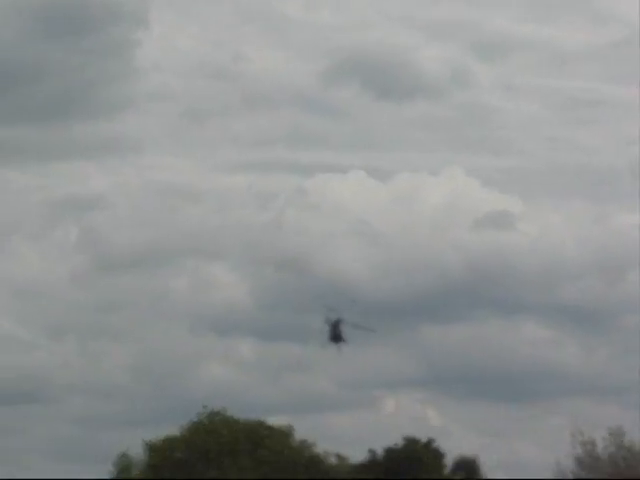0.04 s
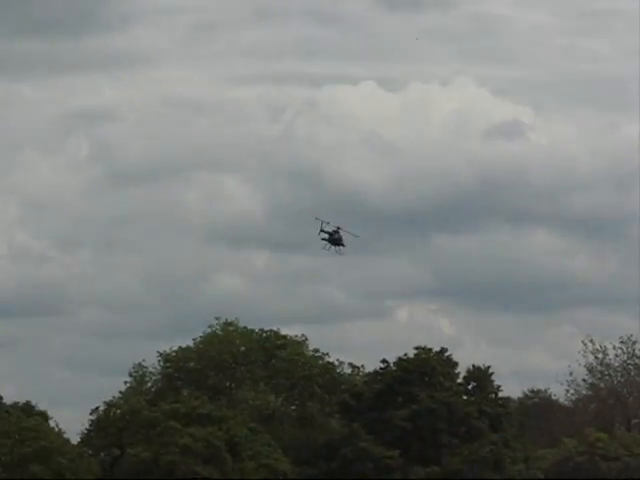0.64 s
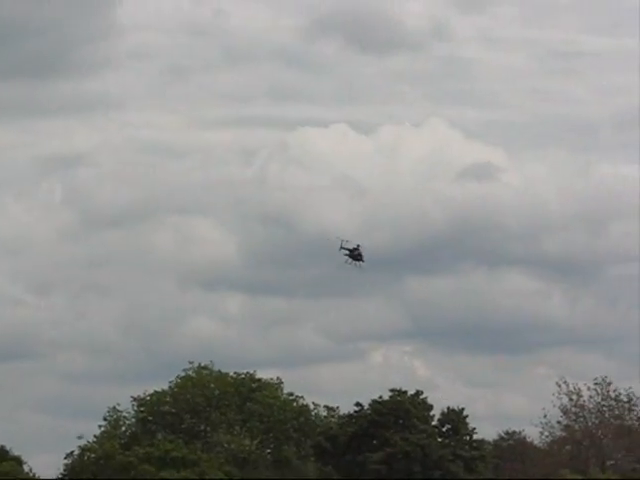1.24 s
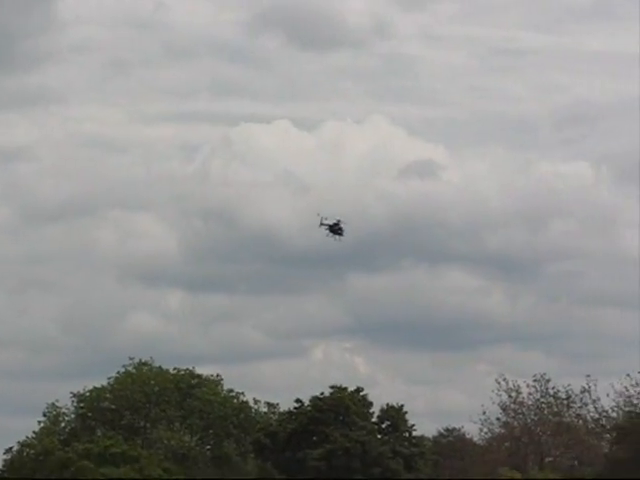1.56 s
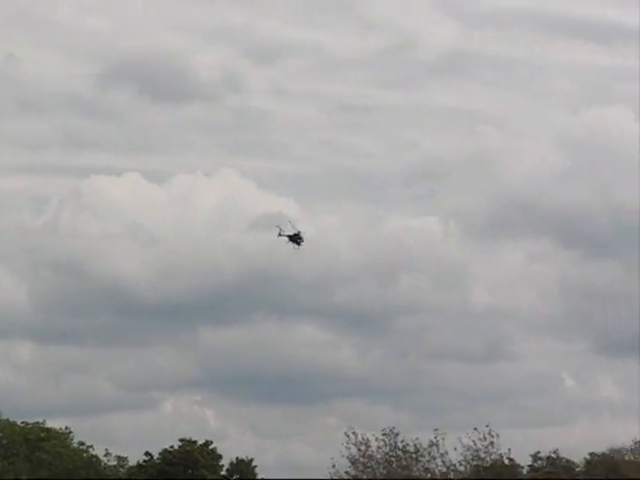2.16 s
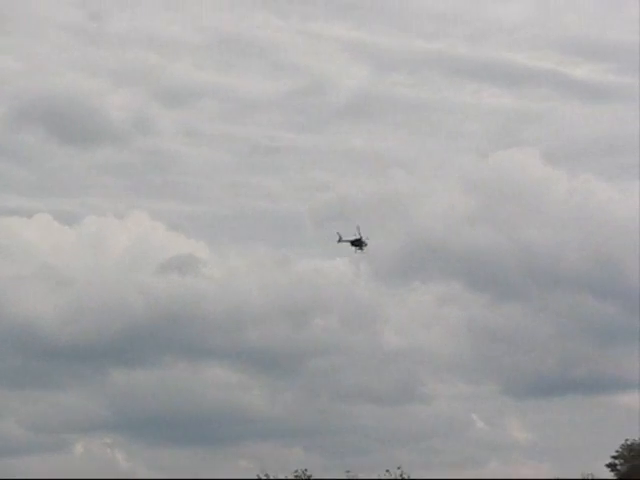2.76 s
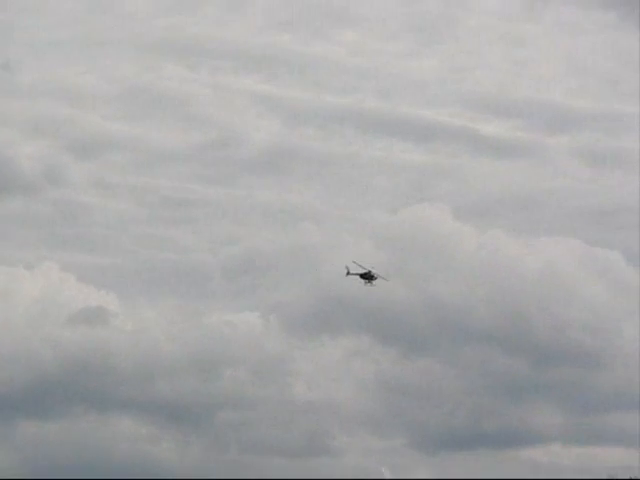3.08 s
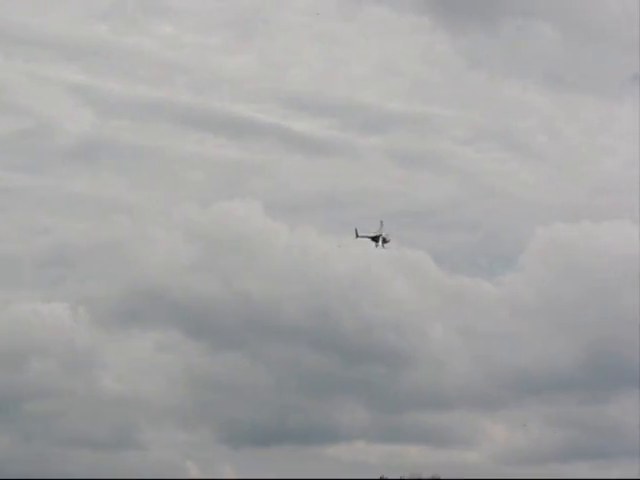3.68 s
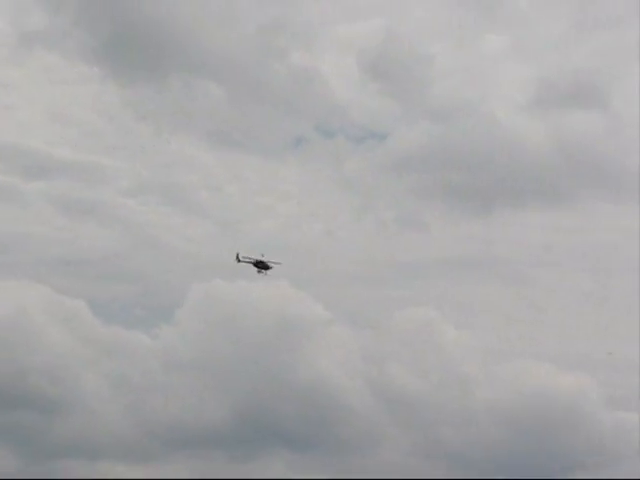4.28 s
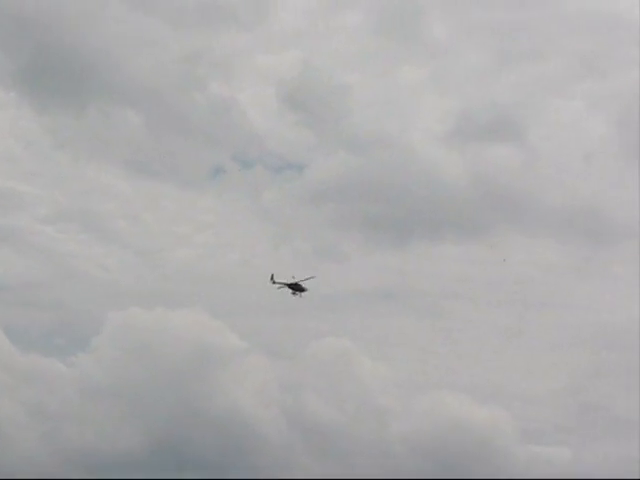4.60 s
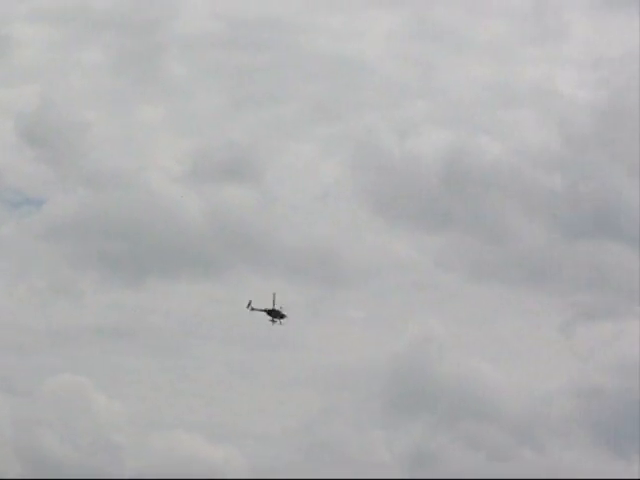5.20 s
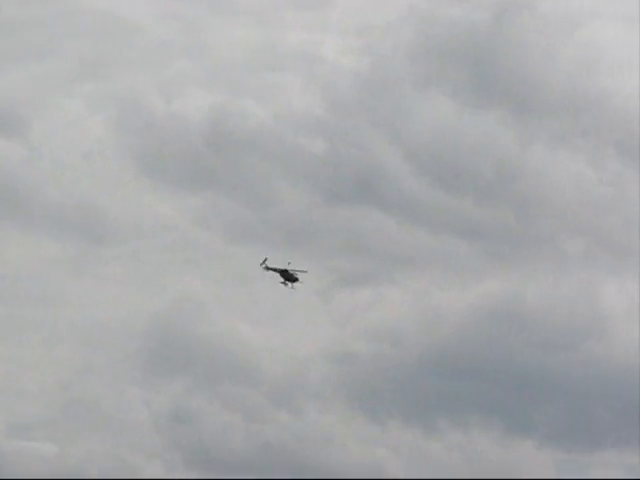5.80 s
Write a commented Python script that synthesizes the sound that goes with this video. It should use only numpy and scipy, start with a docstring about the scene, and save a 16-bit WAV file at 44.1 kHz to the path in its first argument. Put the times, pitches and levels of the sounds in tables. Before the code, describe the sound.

A radio-controlled model helicopter flies over an open field, its small two-stroke engine giving a continuous high, raspy whine over the whir of the rotors. The tone flutters and flares as it turns, creeping up in pitch. Near the end the main rotor thrums louder and the tail rotor surges briefly. A breeze rumbles lightly on the microphone, with a faint, low, far-off drone underneath.

```python
"""A model helicopter flies over a field, at first tail towards us, above a breeze and a far-off drone.
Its two-stroke engine whines and rasps through a ringing muffler while the rotors chop the air and hum.
From 1.6 s it turns in steps to face us, and the engine climbs in pitch as the drone slowly sinks.
Near 5 s the tail rotor surges, the main rotor thrums louder and the drone swells again.
All along, trees scatter the sound into a microphone with two openings, left and right."""
import sys
import numpy as np
from scipy import signal
from scipy.fft import rfft, irfft, next_fast_len
from scipy.io import wavfile
from scipy.ndimage import map_coordinates

SR = 44100
rng = np.random.default_rng(int(sys.argv[2]) if len(sys.argv) > 2 else 0)


def file_out(sig):
    """Save sig as 16-bit WAV at sys.argv[1]."""
    # one column per channel
    cols = np.atleast_2d(sig).T
    # limit, then scale
    lim = np.clip(cols, -1, 1)
    pcm = np.round(lim * 32767).astype(np.int16)
    wavfile.write(sys.argv[1], SR, pcm)


N = 257984  # 5.85 s

# Levels are relative: the functions set the final mix. Harmonic k is a tone at k times the firing rate.
# how often the engine fires: t/s, f/Hz
FIRING_RATE = [(0, 249.5), (.45, 250), (.95, 251.5), (1.3, 253.8), (1.9, 253.6), (2.55, 257.3),
               (2.8, 257.5), (3.2, 259.7), (3.6, 263.4), (4.0, 267.6), (4.4, 270.4), (4.8, 274.4),
               (5.4, 279), (5.6, 279.3), (5.85, 280.9)]
MAIN_GEAR, TAIL_GEAR = 2 / 8.5, 9 / 8.5  # blade passes per firing
# the side we see: t/s, view (0 behind, 1 rear quarter, 2 side, 3 front quarter)
VIEW_OVER_TIME = [(0, 0), (1.6, 0), (2.2, 1), (2.82, 1), (3.08, 2), (3.6, 2), (4.2, 3), (5.85, 3)]

# the harmonics that make the whine: harmonic number
WHINE_HARMONICS = [2, 3, 5, 6, 8, 9, 10, 11, 12, 13, 14]
# how loud each of them is, up to the thirteenth: t/s, level/dB
LEVEL_2 = [(0, -42), (1.5, -45.5), (2.5, -46.5), (3.4, -50.5), (3.9, -45), (4.3, -44), (4.7, -46.5),
           (5.2, -50), (5.55, -63)]
LEVEL_3 = [(0, -40.5), (.7, -48.5), (1.3, -45), (1.7, -46), (2.548, -41), (2.95, -44.5), (3.15, -58),
           (3.6, -57), (4.1, -45.5), (4.3, -48), (4.45, -62), (4.75, -59), (4.85, -46), (5.5, -40),
           (5.8, -52)]
LEVEL_5 = [(0, -34), (.25, -42.5), (.55, -52), (1.0, -46.5), (1.55, -47), (1.9, -45), (2.55, -40),
           (2.95, -34), (3.25, -44.5), (4.1, -61), (5, -58), (5.45, -47), (5.85, -39)]
LEVEL_6 = [(0, -33.5), (.3, -31.5), (.7, -42), (1.4, -51), (1.8, -43), (2.8, -50.5), (3.02, -30),
           (3.65, -33.5), (4.03, -46), (4.3, -38.5), (5.05, -33), (5.25, -38.5), (5.85, -40)]
LEVEL_8 = [(0, -31.5), (.32, -22.5), (.42, -25.5), (.55, -38), (.78, -26), (.93, -37.5), (1.14, -22.5),
           (1.25, -27), (1.37, -39.5), (1.57, -28), (1.78, -38.5), (1.96, -28), (2.2, -41), (2.5, -29.5),
           (2.84, -56), (3.05, -30.5), (3.3, -40), (3.5, -32.5), (3.8, -32.5), (4.051, -54), (4.25, -34),
           (4.549, -50), (4.82, -31.5), (5.2, -57), (5.52, -39), (5.75, -60)]
LEVEL_9 = [(0, -47), (.28, -50), (.55, -58), (.8, -45), (1.598, -65), (2.7, -47), (3.2, -58), (3.68, -47),
           (3.85, -39), (4.45, -44.5), (5.15, -39), (5.85, -52)]
LEVEL_10 = [(0, -21.5), (.24, -22), (.5, -43), (1.1, -45), (1.55, -37), (1.78, -43), (1.95, -23.5),
            (2.12, -25), (2.28, -19.5), (2.52, -17), (2.699, -20.5), (2.85, -31), (2.98, -28.5),
            (3.05, -22.5), (3.22, -24.5), (3.32, -19), (3.42, -27), (3.5, -22), (3.64, -29.5), (3.8, -25),
            (4.03, -45.5), (4.36, -50), (4.44, -26.5), (4.52, -33), (4.88, -22), (5.08, -31.5), (5.23, -21),
            (5.45, -34.5), (5.53, -27), (5.68, -33), (5.85, -35.5)]
LEVEL_11 = [(0, -30), (.212, -20.5), (.36, -42), (.48, -30.5), (.6, -39), (.76, -28), (.87, -51),
            (.97, -32), (1.12, -25.5), (1.26, -42), (1.43, -30), (1.75, -49), (2.05, -46), (2.5, -32),
            (3.1, -52), (3.6, -43), (3.85, -33), (4.02, -51), (4.2, -36.5), (4.55, -33), (4.92, -26.5),
            (5.12, -33), (5.35, -28.5), (5.85, -39)]
LEVEL_12 = [(0, -23.5), (.21, -23.5), (.55, -52), (.9, -39), (1.05, -45), (1.3, -33.5), (1.6, -41),
            (1.95, -31), (2.2, -44), (2.55, -42), (2.74, -29.5), (3.2, -42.5), (4.5, -44), (4.88, -28),
            (5.15, -42), (5.4, -37), (5.85, -57)]
LEVEL_13 = [(0, -28.5), (0.219, -22.5), (.62, -45), (.87, -29), (1.05, -41), (1.3, -31.5), (1.65, -40),
            (2.248, -30), (2.7, -45), (3.4, -50), (5.85, -53)]
# the harmonics that make the exhaust's hum: harmonic number
HUM_HARMONICS = [4, 7]
# one row for each of them: level/dB in views 0, 1, 2, 3
HUM_BY_VIEW = [(-53, -57.5, -42, -44.5), (-51.5, -34, -43.5, -41.5)]

# the rough part of the exhaust: t/s, rasp level/dB, sizzle level/dB
ROUGH_LEVELS = [(0.0, -25, -32), (0.19, -26.5, -32), (0.36, -28, -37.5), (0.6, -36, -44.5),
                (0.82, -29.5, -39), (1.3, -32, -42.5), (1.7, -34, -41.5), (2.85, -31, -42.5),
                (3.05, -31, -40), (3.2, -36, -44.5), (3.5, -32, -41.5), (3.6, -41.5, -48),
                (3.7, -31.5, -40), (3.93, -33, -41.5), (4.03, -35, -44.5), (4.42, -35.5, -46.5),
                (4.52, -39, -49.5), (4.65, -31.5, -41.5), (5.47, -31.5, -39.5), (5.85, -34, -46)]
# its brief flares and dips: t/s, half length/s, rasp change/dB, sizzle change/dB, whistle change/dB
EXHAUST_FLARES = [(1.53, .05, -0.5, -3, -2), (1.82, .07, 0.5, -1, -4), (2.02, 0.055, 2.5, 5, 5),
                  (2.25, 0.049, 2, 6, -5), (2.38, 0.032, 3, 0.5, 12), (2.56, 0.098, 1, -4.5, 1.5),
                  (2.72, 0.072, 1.5, 5.5, 10.5), (2.94, 0.038, 0.5, 2, 9), (3.39, 0.053, -2.5, 0, 5.5),
                  (3.82, 0.027, 4.5, 7, 13), (4.17, 0.044, 2, -1, -5), (4.24, 0.031, 5, 2, -8),
                  (4.305, 0.023, -8, -4, -5), (4.38, 0.067, 1, 3.5, -4), (4.745, 0.019, -3, 5, 4.5),
                  (4.83, 0.12, 1, 5, 10.5), (4.872, 0.04, 4, 4, -1), (5.07, .045, -2.5, -1, -3.5),
                  (5.23, 0.094, 1, -1, -4.5), (5.53, 0.031, 2.5, 0, 3), (5.65, 0.063, -1.5, 1.5, 7)]
# the muffler's tone colour (how strong each frequency is): f/Hz, level/dB
MUFFLER_COLOUR = [(900, -44.5), (1350, -9.5), (1600, -17), (1950, -4), (2250, -7.5), (2550, 0.5),
                  (2800, -0.5), (3050, -3.5), (3300, -7.5), (3650, -7.5), (4200, -16), (6000, -62)]
# harmonics thrown back by the blades: harmonic number, shift/blade rates, level/dB
THROB_TONES = [(10, -1, -5), (10, .5, -5), (10, 1, 0), (11, -1, -7), (11, -.5, -7), (11, 1, -6)]
# how strong that throb is: level/dB in views 0, 1, 2, 3
THROB_BY_VIEW = [-3.5, -4, -3.5, 0]
# the sizzle's colour from behind and from the front: f/Hz, level/dB
SIZZLE_REAR = [(2800, -25), (3700, -10), (4200, -8), (4550, -5), (5000, 4), (5700, -7), (6300, 1),
               (6800, -8), (7450, -2.5), (7900, -1), (9000, -7.5), (10000, -9.5), (10900, -22),
               (13000, -29)]
SIZZLE_FRONT = [(2800, -22), (3700, -7), (4200, -2.5), (4500, -2), (5100, 0), (5550, 5), (6300, -4),
                (7000, -5.5), (7500, -13.5), (8000, -7.5), (9300, -8), (10300, -29), (11000, -44),
                (13000, -34.5)]
# two thin tones that stand out from the front: harmonic number
THIN_HARMONICS = [16, 20]
# the sizzle's strongest ring comes and goes: t/s, level/dB
RING_LEVEL = [(0, -14.5), (.42, -7), (.62, -22), (.85, -7.5), (1.35, -4.5), (1.6, -12), (2.25, -12),
              (2.7, -11), (3.2, -16.5), (4.7, -17), (4.88, -4.5), (5.02, -13.5), (5.85, -23)]
# colours of that ring and of the top whistle: f/Hz, level/dB
RING_COLOUR = [(4100, -20), (4600, -6), (4800, -4), (5050, 0), (5400, -17)]
WHISTLE_COLOUR = [(6800, -60), (7900, -11), (8250, -2), (8650, -12.5), (10500, -33.5), (12000, -66)]

# air moved by the blades: t/s, thrum level/dB, wash level/dB
ROTOR_LEVELS = [(0, -49, -37.5), (.65, -57, -40), (1.8, -56, -44), (2.9, -56.5, -39), (3.67, -50, -38),
                (4.5, -49.5, -39), (5.15, -43, -38), (5.85, -42.5, -39)]
# colours of the rushing wash and the low churn of air: f/Hz, level/dB
WASH_COLOUR = [(60, -23), (130, -10.5), (230, -8), (420, -8), (650, 1.5), (950, 7.5), (1200, -7.5),
               (1600, -1.5), (2500, -7), (5000, -37)]
CHURN_COLOUR = [(150, -27), (250, -7), (300, 3), (380, 8.5), (480, 2.5), (700, -45.5)]
# main rotor tones and their beats with the engine: multiple of the blade rate, level/dB
MAIN_TONES = [(1, -11), (2, -16), (4.25, -9), (5.25, -4), (6.25, -10)]
# the tail rotor's higher tones: multiple of its blade rate, level/dB
TAIL_TONES = [(2, -6.5), (3, -3), (4, -23)]
# the tail rotor bites the air in short surges: t/s, half length/s, level/dB
TAIL_SURGES = [(4.835, 0.043, -39), (5.16, 0.035, -39), (5.265, 0.031, -38), (5.41, 0.021, -34),
               (5.573, 0.02, -46)]
# colour of a surge: f/Hz, level/dB
SURGE_COLOUR = [(200, -3), (295, -0.5), (590, -7), (880, -2.5), (1200, -21.5)]

# the far drone's sinking pitch: t/s, f/Hz
DRONE_HZ = [(0, 92.86), (2, 87.2), (4, 86.75), (5.85, 85.1)]
# it swells at both ends: t/s, level/dB
DRONE_LEVEL = [(0, -46), (.4, -39.5), (.8, -46.5), (.92, -59), (1.45, -57), (1.7, -47.5), (2.8, -52.5),
               (4.45, -47), (4.8, -54.5), (5.45, -39), (5.85, -43.5)]
# the breeze starts strong, then eases: t/s, level/dB
BREEZE_LEVEL = [(0, 9), (1.2, -1), (2, 3), (3.5, -1), (5.5, -2)]
# colours of the breeze, its buffeting of the microphone and the drone's rumble: f/Hz, level/dB
BREEZE_COLOUR = [(15, -13), (30, -12.5), (50, -5), (70, -3.5), (115, -2), (160, -11.5), (220, -5.5),
                 (320, -16.5), (1000, -40.5), (4000, -50), (9000, -97)]
BUFFET_COLOUR = [(20, -14), (60, -1), (200, -18.5), (1000, -69)]
RUMBLE_COLOUR = [(35, -23), (65, -6.5), (90, 4), (118, 0), (150, -17), (400, -48), (2000, -110)]

# the bounce off the grass comes later as the helicopter climbs: t/s, delay/s
GRASS_DELAY = [(0, 0.00051), (2, 0.00044), (3.2, 0.00061), (4.1, 0.00066), (4.6, 0.00061), (5.2, 0.00067),
               (5.8, 0.00066)]
# the grass dulls that bounce: f/Hz, level/dB
GRASS_COLOUR = [(1200, -1), (3000, -27.5)]
# how long the trees' echo takes to fade by 60 dB: f/Hz, t/s
TREE_DECAY = [(200, 0.37), (2500, 0.3), (10000, 0.064)]
# how strongly the leaves scatter sound: f/Hz, level/dB
LEAF_COLOUR = [(100, -22.5), (300, -8), (1000, -5), (2500, -3.5), (5000, -9), (10000, 0)]
# the microphone's two openings: f/Hz, left minus right level/dB, left phase lead/rad
MIC_OPENINGS = [(50, 0.5, -0.0), (900, 2.6, -0.4), (1120, 8, 0.0), (1300, 0.7, 2.3), (1650, 0.4, 0.3),
                (2350, -0.4, -0.5), (2550, 3.4, -0.55), (2750, 6.6, -0.75), (3050, 7.0, -2.0),
                (3500, -0.4, -2.8), (4100, -1.0, -3.9), (4700, -4.3, -7.6), (5450, -9.5, -9.1),
                (5950, -11.0, -13.0), (7300, -9.6, -15.2), (8250, -23.8, -16.9), (8900, -32.4, -17.2),
                (10000, -13.9, -19.2), (10900, -1.1, -21.3)]


def exhaust_whine(turns):
    """Clear harmonics line up into one pulse a firing; moving air makes them flutter and fray."""
    uneven_firing = 1 + 0.02 * wobble(250)
    tables = (LEVEL_2, LEVEL_3, LEVEL_5, LEVEL_6, LEVEL_8, LEVEL_9,
              LEVEL_10, LEVEL_11, LEVEL_12, LEVEL_13)
    levels = [curves(rows)[0] + 0.48 * wobble(9.7) + 0.95 * wobble(45) for rows in tables]
    levels.append(levels[-1] - 7 + 1.5 * wobble(5.4))  # the fourteenth follows the thirteenth
    whine = 0
    for k, db in zip(WHINE_HARMONICS, levels):
        # the muffler answers each firing late and spreads it out
        cycles = k * (turns - 0.153) - 0.06045 * (k - 10) ** 2
        stray = .037 * (k / 10) ** 3 * wobble(110)
        whine += amp(db) * unit(np.cos(2 * np.pi * (cycles + stray)))
    return amp(-1.8) * uneven_firing * whine


def exhaust_hum(turns, view):
    """Two harmonics change with the view, swell with a loud rasp and die away in the last half second."""
    cruise_db, fade_start_s, fade_db_per_s = -33, 5.46, 31
    rasp_db = curves(ROUGH_LEVELS)[0] + 0.13 * swells(EXHAUST_FLARES)[0]
    push = 1.77 * np.maximum(rasp_db - cruise_db, 0)
    fade_db = fade_db_per_s * np.maximum(np.arange(N) / SR - fade_start_s, 0)
    hum = 0
    for k, dbs in zip(HUM_HARMONICS, HUM_BY_VIEW):
        gain = np.interp(view, range(4), amp(dbs)) * amp((k / 5) ** 2 * push + 0.02 * k * wobble(6))
        stray = 0.033 * (k / 10) ** 2 * wobble(100)
        hum += gain * tone(k * turns + stray, flutter_db=1.3, rate=22)
    return amp(-4 - fade_db) * hum


def muffler_snarl(turns, view):
    """Gas puffs ring the muffler; passing blades throw back its strongest tones, shifted in pitch."""
    rasp = coloured(puffs(turns, depth=1.1), MUFFLER_COLOUR)
    rasp *= 1 + 0.07 * np.cos(np.pi * MAIN_GEAR * turns)  # one swell every two blade passes
    throb = 0
    for k, shift, db in THROB_TONES:
        cycles = (k + shift * MAIN_GEAR) * turns + .15 * wobble(35)
        throb += amp(db) * tone(cycles, flutter_db=2.5, rate=12)
    return amp(-1) * rasp + amp(np.interp(view, range(4), THROB_BY_VIEW)) * unit(throb)


def outlet_sizzle(turns, view, facing):
    """Gas and high harmonics sizzle at the outlet, smearing and changing colour as the nose turns."""
    upper = harmonics(turns, range(17, 28), stray_rad=1.1 + .32 * view, rate=110)
    jet = unit(amp(-5) * upper + puffs(turns, depth=.42))
    thin = sum(amp(-8.5 + 2.5 * np.tanh(wobble(7))) * harmonics(turns, [k], stray_rad=.85, rate=85)
               for k in THIN_HARMONICS)
    return (1 - facing) * coloured(jet, SIZZLE_REAR) + facing * (coloured(jet, SIZZLE_FRONT) + thin)


def rough_exhaust(turns, view):
    """The puffing gas snarls, sizzles and whistles; each part flares, and flickers in the moving air."""
    body_db, treble_db = curves(ROUGH_LEVELS)
    rasp_flare, sizzle_flare, whistle_flare = swells(EXHAUST_FLARES)
    facing = np.clip(0.37 * (view - 1), 0, 1)  # share of the head-on sound
    rasp_db = body_db + rasp_flare + .7 * wobble(10)
    sizzle_db = treble_db + 2.5 + sizzle_flare + wobble(16)
    whistle_db = treble_db - 12.5 + 6.5 * facing + whistle_flare + 1.2 * wobble(16)
    snarl = muffler_snarl(turns, view)
    sizzle = amp(-0.5) * outlet_sizzle(turns, view, facing)
    top = harmonics(turns, [30, 31], stray_rad=1.35, rate=110)
    whistle = coloured(amp(-8.5) * top + puffs(turns, depth=0.55), WHISTLE_COLOUR)
    ring = coloured(harmonics(turns, range(17, 22), stray_rad=1.45, rate=100), RING_COLOUR)
    sizzle += amp(curves(RING_LEVEL)[0] + 0.91 * wobble(14)) * ring
    return amp(rasp_db) * snarl + amp(sizzle_db) * sizzle + amp(whistle_db) * whistle


def rotors(turns, view):
    """The main blades chop the air and thrum; the tail rotor hums and surges as it steers."""
    thrum_db, wash_db = curves(ROTOR_LEVELS)
    main, tail = MAIN_GEAR * turns, TAIL_GEAR * turns  # blade passes so far
    wash = unit(grass_bounce(coloured(puffs(main, depth=0.11), WASH_COLOUR), strength=0.8))
    churn = coloured(puffs(main, depth=0.96), CHURN_COLOUR)
    bite = harmonics(tail, [1, 2, 3], stray_rad=.8, rate=55) + .5 * puffs(main, depth=.9)
    surge_gain = sum(amp(db) * bump(t, half_length) for t, half_length, db in TAIL_SURGES)
    surges = surge_gain * coloured(bite, SURGE_COLOUR)
    main_tones = sum(amp(db) * tone(k * main, flutter_db=2.5, rate=6.6) for k, db in MAIN_TONES)
    tail_hum = amp(-8.5 + 2 * view) * tone(tail, flutter_db=1, rate=6.5)
    tail_tones = sum(amp(db) * tone(k * tail, flutter_db=2, rate=5) for k, db in TAIL_TONES)
    thrum = amp(-4.5) * churn + amp(0.2) * main_tones + tail_hum
    return amp(wash_db - 2) * wash + amp(thrum_db) * thrum + amp(-50) * tail_tones + surges


def far_drone():
    """A low, far-off drone slowly sinks in pitch and flutters over a rumble."""
    hz, db = curves(DRONE_HZ) + curves(DRONE_LEVEL)
    cycles = np.cumsum(hz) / SR
    tones = tone(cycles, flutter_db=2, rate=22) + amp(-16.5) * tone(2 * cycles, flutter_db=2.5, rate=2.6)
    rumble = coloured(rng.standard_normal(N), RUMBLE_COLOUR)
    return amp(db) * (amp(-0.5) * tones + amp(-11.5) * rumble)


def breeze():
    """Gusts rumble over the field and lightly buffet each microphone opening on its own."""
    gust = amp(curves(BREEZE_LEVEL)[0] + .6 * wobble(1.5) + 1.8 * wobble(9))
    air = coloured(rng.standard_normal(N), BREEZE_COLOUR)
    buffet = np.array([coloured(rng.standard_normal(N), BUFFET_COLOUR) for side in range(2)])
    return gust * (amp(-52) * air + amp(-62) * buffet)


def grass_bounce(x, strength):
    """A dull, late copy bounces off the ground, boosting some frequencies and weakening others."""
    delay, = curves(GRASS_DELAY)
    dull = filtered(x, lambda hz: amp(along(GRASS_COLOUR, hz)))
    return x + strength * np.interp(np.arange(N) - delay * SR, np.arange(N), dull)


def tree_echo(x):
    """The trees scatter back a short, blurred echo, different on each side."""
    hz, t, noise = signal.stft(rng.standard_normal((2, SR // 2)), SR, nperseg=256)
    fade = amp(-60 * t / along(TREE_DECAY, hz)[:, None])
    fade *= amp(along(LEAF_COLOUR, hz))[:, None] / np.linalg.norm(fade, axis=1, keepdims=True)
    echo = signal.istft(noise * fade, SR, nperseg=256)[1] / np.sqrt(128)
    return signal.fftconvolve(x, echo, axes=1)[:, :N]


def microphone(x):
    """The housing shades and delays each frequency differently for the left and right openings."""
    f, balance_db, lead = np.transpose(MIC_OPENINGS)

    def response(hz):
        pan = np.arctan(amp(np.interp(hz, f, balance_db)))
        shift = np.exp(.5j * np.interp(hz, f, lead))
        return np.sqrt(2) * np.array([np.sin(pan) * shift, np.cos(pan) / shift])
    return filtered(x, response)


def puffs(cycles, depth):
    """Noise that swells once a cycle."""
    return unit(rng.standard_normal(N) * np.exp(depth * np.cos(2 * np.pi * cycles)))


def tone(cycles, flutter_db, rate):
    """A pure tone whose level flutters in the moving air."""
    return unit(np.sin(2 * np.pi * (cycles + rng.random())) * amp(flutter_db * wobble(rate)))


def harmonics(cycles, numbers, stray_rad, rate):
    """A stack of tones; swirling air pushes each a little early or late on its own."""
    return unit(sum(np.sin(2 * np.pi * (k * cycles + rng.random()) + stray_rad * wobble(rate))
                    for k in numbers))


def coloured(x, colour):
    """Give x a tone colour with a filter that rings only after each push; the result has strength 1."""
    size = 8192
    cepstrum = irfft(np.log(amp(along(colour, np.fft.rfftfreq(size, 1 / SR)))))
    cepstrum[1:size // 2] *= 2  # move the ringing from before the push to after it
    cepstrum[size // 2 + 1:] = 0
    ringing = irfft(np.exp(rfft(cepstrum)))
    return unit(signal.fftconvolve(x, ringing)[:N])


def filtered(x, response):
    """Scale and delay each frequency of x as response(hz) says."""
    size = next_fast_len(N + SR // 2)
    return irfft(rfft(x, size) * response(np.fft.rfftfreq(size, 1 / SR)), size)[..., :N]


def wobble(rate):
    """A smooth curve through `rate` random points a second."""
    points = rng.standard_normal(int(N * rate / SR) + 4)
    coarse = np.arange(0, N + 32, 32)
    return np.interp(np.arange(N), coarse, map_coordinates(points, [coarse * rate / SR]))


def bump(t, half_length):
    """A flat-topped swell of height 1 around time t."""
    return np.exp(-((np.arange(N) / SR - t) / half_length) ** 4)


def swells(rows):
    """Add up one bump a row, giving a curve for each dB column."""
    return sum(np.outer(dbs, bump(t, half_length)) for t, half_length, *dbs in rows)


def curves(rows):
    """Join a table's points over time: one curve for each column after the first."""
    t, *columns = np.transpose(rows)
    return [np.interp(np.arange(N) / SR, t, column) for column in columns]


def along(rows, hz):
    """Read a table between its frequencies, on a log scale."""
    f, values = np.transpose(rows)
    return np.interp(np.log(hz + 1), np.log(f + 1), values)


def amp(db):
    """Turn decibels into a gain."""
    return 10 ** (np.asarray(db) / 20)


def unit(x):
    """Scale x to an average strength (rms) of 1."""
    return x / np.sqrt(np.mean(x ** 2) + 1e-20)


def scene():
    """One engine shaft drives the exhaust and both rotors; the passing blades chop the exhaust sound."""
    firing_hz, view = curves(FIRING_RATE) + curves(VIEW_OVER_TIME)
    turns = np.cumsum(firing_hz * (1 + 0.00069 * wobble(30))) / SR  # shaft turns so far, one a firing
    blade_phase = 2 * np.pi * MAIN_GEAR * turns
    chop = 1 + .08 * np.cos(blade_phase) + .07 * np.cos(blade_phase / 2)
    clear = microphone(chop * (exhaust_whine(turns) + exhaust_hum(turns, view)) + far_drone())
    rough = microphone(chop * rough_exhaust(turns, view) + rotors(turns, view))
    return clear + rough + tree_echo(rough + amp(-12) * clear) + breeze()


def record(dry):
    """Nothing above 13200 Hz is kept."""
    return filtered(dry, lambda hz: hz < 13200)


dry = scene()
out = record(dry)
file_out(out)
```